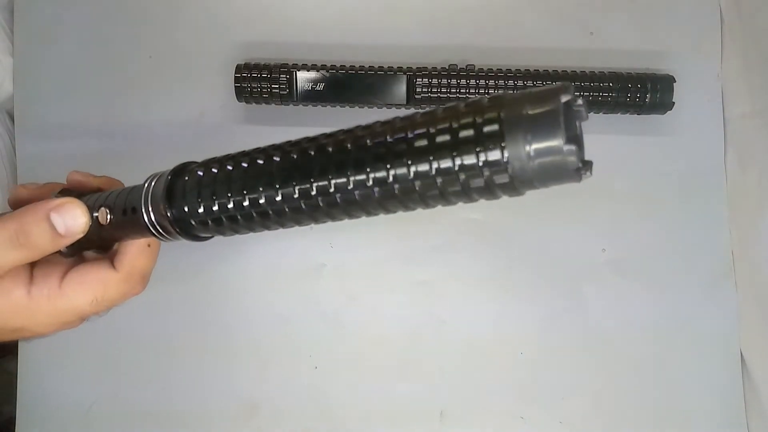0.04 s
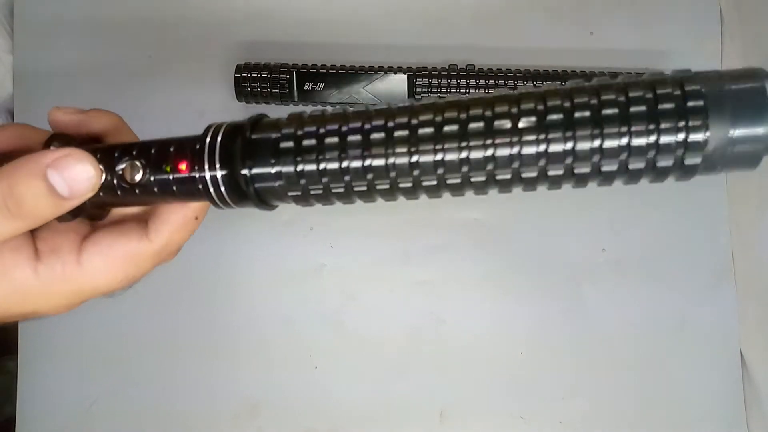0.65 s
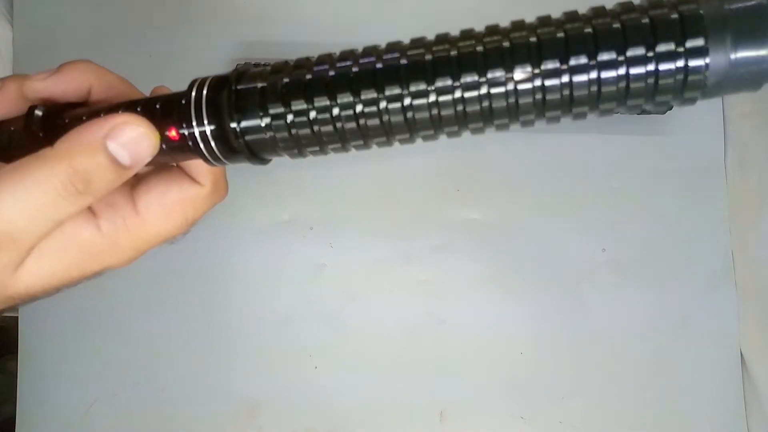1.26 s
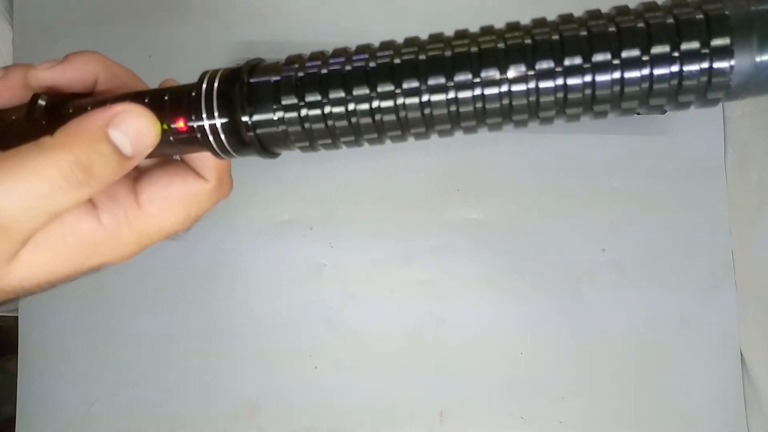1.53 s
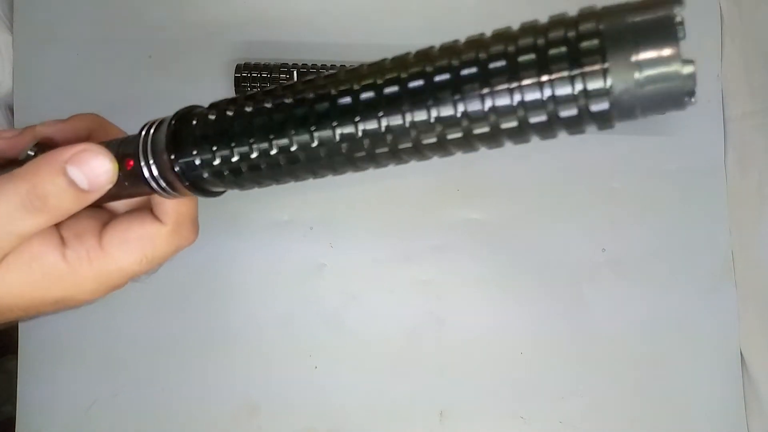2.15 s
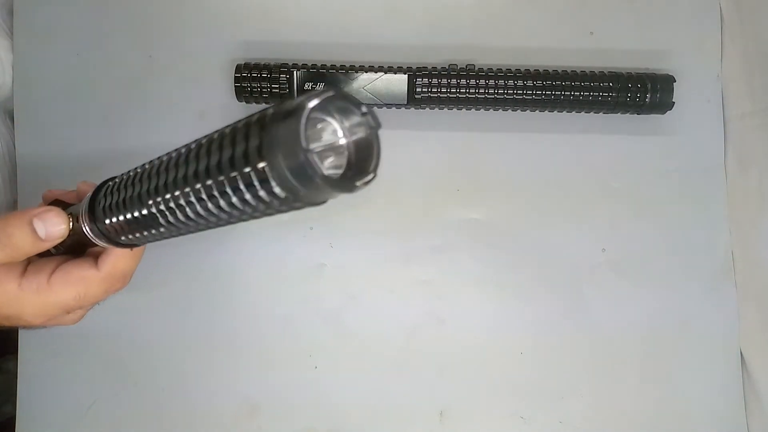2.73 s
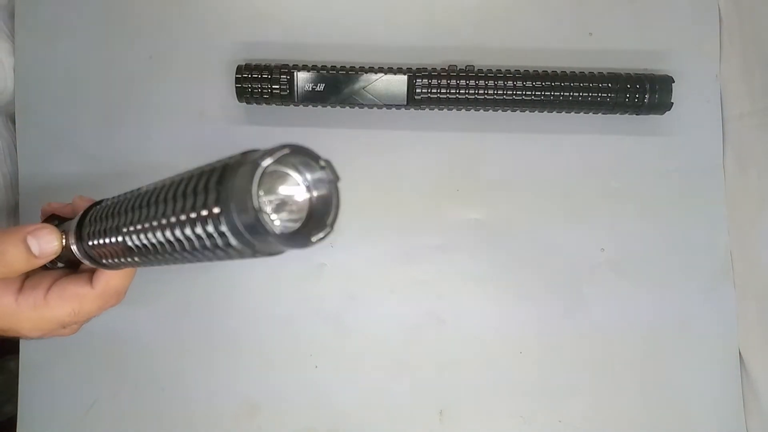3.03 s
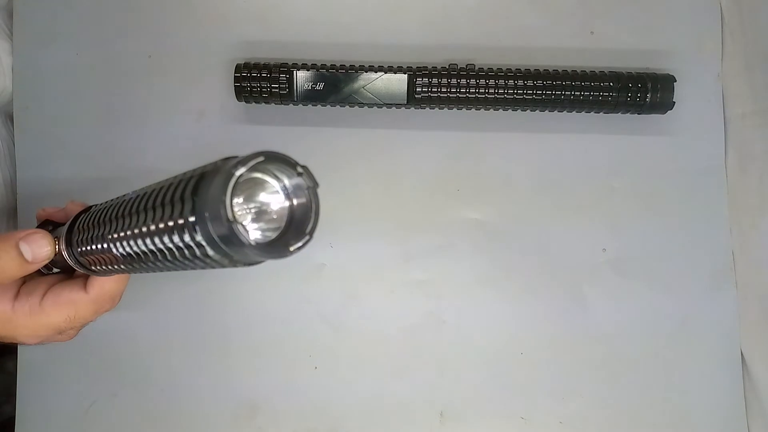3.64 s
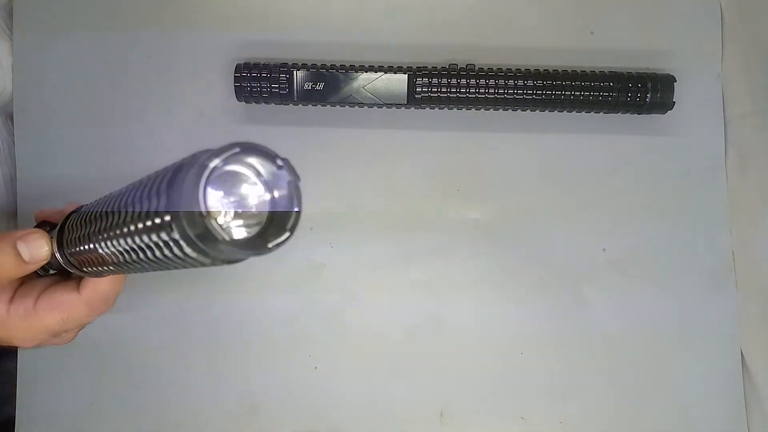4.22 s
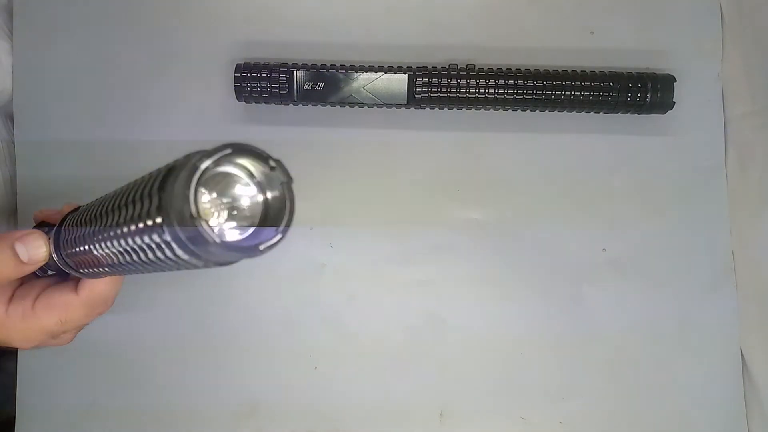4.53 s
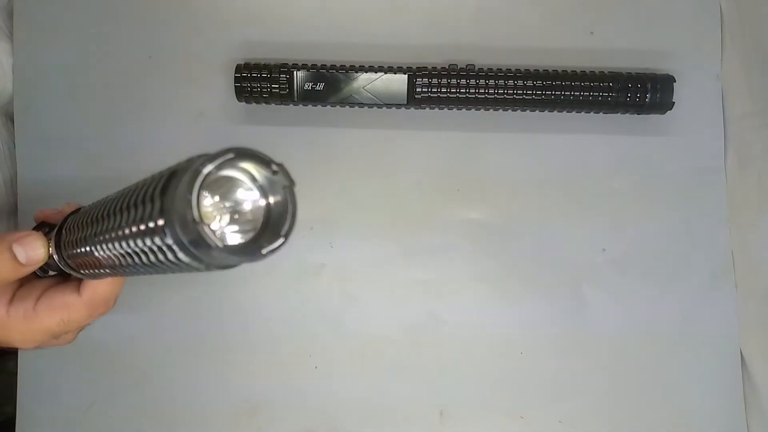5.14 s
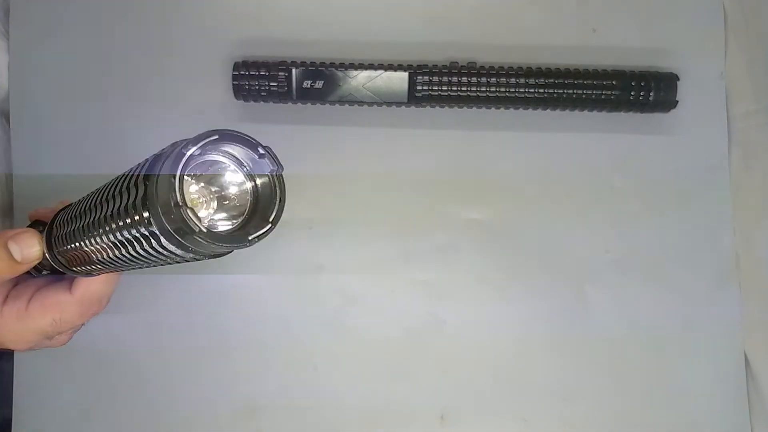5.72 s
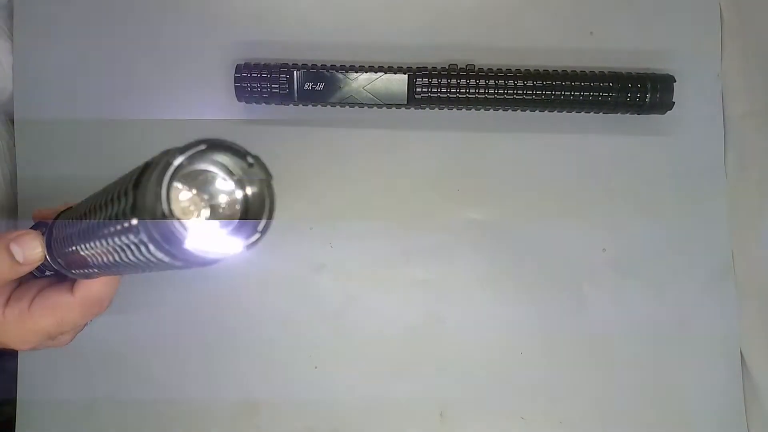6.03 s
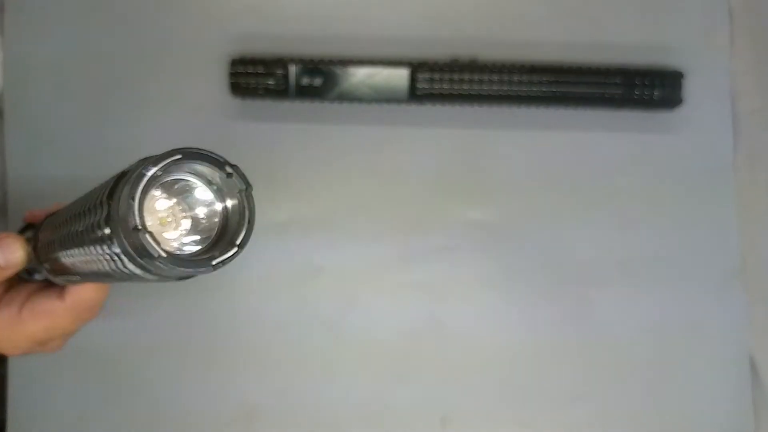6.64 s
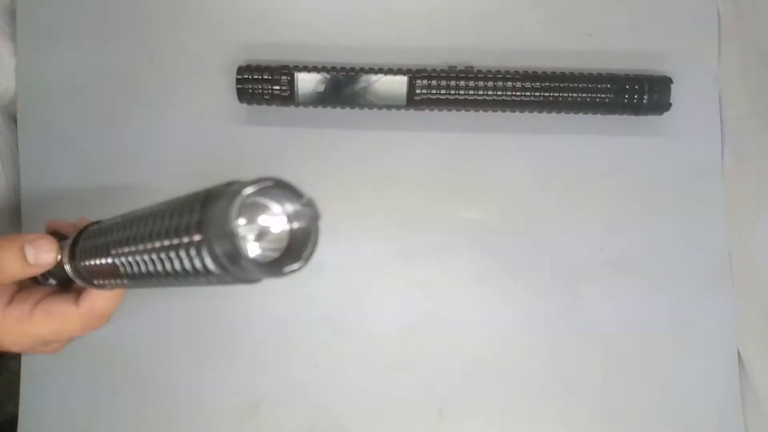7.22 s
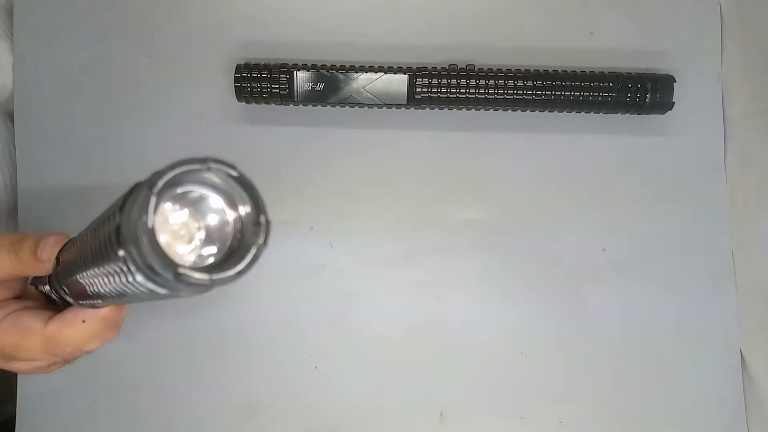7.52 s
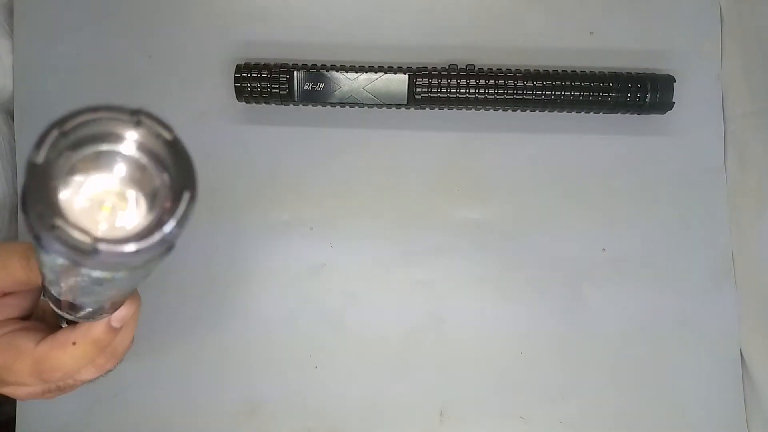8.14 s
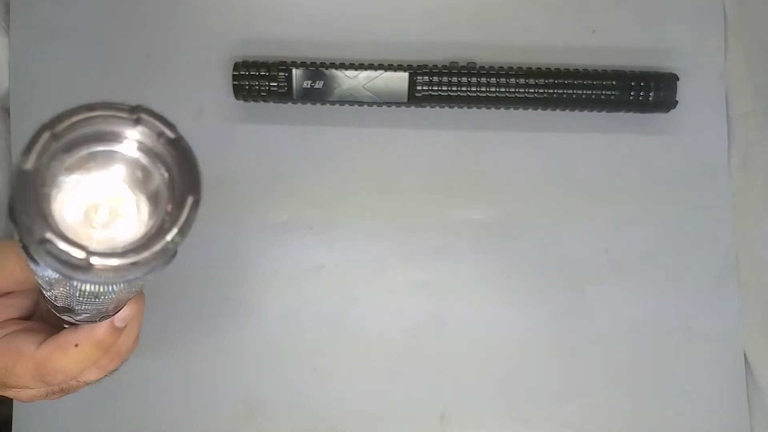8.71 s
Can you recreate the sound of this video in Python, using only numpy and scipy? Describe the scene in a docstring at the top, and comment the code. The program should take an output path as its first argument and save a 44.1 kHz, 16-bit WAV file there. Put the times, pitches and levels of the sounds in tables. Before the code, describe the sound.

A handheld stun baton is switched on with two faint clicks. After about three quiet seconds it gives a short, loud electric zap, then two bursts of harsh, crackling buzz, each about a second long. The arc turns hollow and sputters near the end, and a brief echo follows each burst. Faint finger rubs and clicks remain over soft room hiss. The microphone is close, in a small room.

```python
"""Stun baton in a small room

Close microphone, mono: a baton held over a table is switched on and fires three bursts. About 65 sparks
a second jump its crown; each cracks, thumps, bounces off the table and fills the room. The crown's hollow
colour shifts as the arc hops and travels round it; near the end the arc sputters. The recorder's limiter
pins the buzz, so the echo swells up when a burst stops. Behind it: clicks, fingers and room tone."""
import sys
import numpy as np
from scipy import signal
from scipy.fft import rfft, irfft, next_fast_len
from scipy.io import wavfile
from scipy.ndimage import uniform_filter1d, minimum_filter1d

SR = 44100
rng = np.random.default_rng(int(sys.argv[2]) if len(sys.argv) > 2 else 0)


def wav_record(signal):
    """Record a signal, one row per channel, as 16-bit PCM in the file named by sys.argv[1]."""
    frames = np.transpose(np.atleast_2d(signal))
    bounded = np.clip(frames, -1, 1)
    # unit amplitude maps onto the largest positive 16-bit level
    quanta = np.round(bounded * 32767).astype(np.int16)
    wavfile.write(sys.argv[1], SR, quanta)


N = 395577
TIME = np.arange(N) / SR
SIZE = 4096  # samples in one spark or click
AGE, HZ = np.arange(SIZE) / SR, np.fft.rfftfreq(SIZE, 1 / SR)
TURN_S, TURN_TAKES_S = 4.73, 0.045  # the turn: mid-burst, the buzz goes hollow, softer and duller
LIFT_S, LIFT_TAKES_S = 4.02, 0.64  # the lift: the room tone and the echo's lows come up

# Bursts of sparks: start t/s, length/s, thump/dB, midrange/dB, table bounce/dB, opening snap/dB
BURSTS = [(3.3477, .202, -1.5, -1, -16, -7.5), (4.1134, 1.095, -4.5, 2.5, -24, 6.5),
          (5.6671, .994, -1, 6.5, -18, -10)]
# The capacitor's recharge pace in each burst: t/s, spark rate/Hz
PACE_1 = [(3.348, 61.42), (3.448, 63.92), (3.547, 62.19)]
PACE_2 = [(4.113, 61.88), (4.247, 63.26), (4.382, 65.97), (4.516, 64.21), (4.65, 66.14), (4.784, 63.98),
          (4.918, 66.27), (5.052, 66.62), (5.186, 61.51)]
PACE_3 = [(5.667, 65.24), (5.778, 63.68), (5.888, 65.61), (5.999, 65.84), (6.109, 64.42), (6.219, 62.55),
          (6.33, 62.82), (6.44, 65.89), (6.551, 62.88), (6.661, 60.53)]
def spark_times(jitter_s=0.00036):
    """The capacitor charges and the gap breaks down at an almost steady pace."""
    times = []
    for start, length, *_ in BURSTS:
        t = start + np.arange(0, length, 1 / SR)
        charges = np.cumsum(follow([*PACE_1, *PACE_2, *PACE_3], t)) / SR
        steady = np.interp(np.arange(charges[-1]), charges, t)
        times.extend(steady + jitter_s * rng.standard_normal(len(steady)) * (steady > start))
    return np.array(times)


# The arc's place on the crown: t/s, place (0 = near side, 1 = far side)
PLACE = [(5.67, 0.024), (5.98, 0.039), (6.05, 0.064), (6.09, 0.37), (6.16, 0.4), (6.19, 1), (6.66, 0.83)]
def sparks(times, flutter_db=2, hops_per_s=20, echo_tint=0.19):
    """Crack plus thump, coloured by the crown: the sound at the microphone and that sent into the room."""
    direct, radiated = np.zeros((2, N))
    fade = np.cos(np.pi / 2 * np.arange(SIZE) / SIZE) ** 2
    hand, channel = rng.standard_normal((2, SIZE))
    creep, foot = np.zeros(2 * len(CROWN)), rng.standard_normal(16)
    for s, interval in zip(times, np.diff(times, prepend=0)):
        hand = wander(hand, interval / 0.69)  # echoes change only as the hand moves
        channel = wander(channel, interval / 0.014)  # the hot channel bends
        creep = wander(creep, interval / 0.022)  # the arc's foot creeps, and hops every few sparks
        hops = rng.random() < hops_per_s * interval
        foot = wander(foot, 0.94 * hops)
        place = follow(PLACE, s)
        thump_db, body_db, bounce_db = arc_levels(s)
        spark = crack(s, hand, body_db) * table_bounce(place, bounce_db) + thump(channel, thump_db)
        colour_db = sputter(s, crown(s, place, creep) + passing_peaks(s)) + foot_comb(s, foot) + puffs(s)
        gain = amp(flutter_db * rng.standard_normal())
        add(direct, s, gain * fade * irfft(spark * causal(colour_db)))
        add(radiated, s, fade * irfft(causal(echo_tint * colour_db)))
    return direct, radiated


# The arc swells and shrinks in each burst (the third: near side, then far side): t/s, level/dB
SWELL_1 = [(3.35, -28.5), (3.468, -31.5), (3.55, -34)]
SWELL_2 = [(4.12, -48), (4.35, -41), (4.656, -37), (4.853, -28), (4.93, -23), (5.04, -23), (5.1, -32.5),
           (5.18, -43)]
SWELL_3_NEAR = [(5.67, -55), (5.686, -36), (5.934, -29.5), (5.952, -30), (6.056, -27), (6.096, -45),
                (6.146, -33), (6.18, -42)]
SWELL_3_FAR = [(6.2, -44), (6.26, -30), (6.304, -36), (6.324, -31), (6.432, -34), (6.478, -26),
               (6.538, -46), (6.594, -28), (6.638, -45), (6.66, -41)]
def arc_levels(s, usual_db=-32.5, sag_db_per_s=3):
    """A swollen arc thumps harder and has a fuller midrange, which thins as the burst goes on."""
    nearest_burst = min(BURSTS, key=lambda row: abs(row[0] + row[1] / 2 - s) - row[1] / 2)
    start, _, thump_db, body_db, bounce_db, _ = nearest_burst
    swell_db = follow([*SWELL_1, *SWELL_2, *SWELL_3_NEAR, *SWELL_3_FAR], s) - usual_db
    return thump_db + swell_db, body_db + 0.39 * swell_db - sag_db_per_s * (s - start), bounce_db


# The crack's spectrum, close up: f/Hz, level/dB
CRACK = [(100, -4), (400, -4), (1000, -6), (1900, -7), (3300, -5.5), (4500, -1.5), (6500, -3.5),
         (8200, -5.5), (10000, -10.5), (11300, -19.5), (13700, -21.5), (14800, -4), (15800, -8)]
# Its paths to the microphone by way of things near by: delay/s, level/dB
PATHS = [(0, -4), (.0008, -5), (.0022, -7), (.003, -2), (.0043, -9), (.0052, -16), (.0088, -10)]
def crack(s, hand, body_db, gain_db=47, smear_s=0.00022, scatter_hz=3000, body_hz=1200):
    """The breakdown's spectrum: short waves keep scattering, the midrange is over in milliseconds."""
    nearby = sum(amp(db) ** 2 * (AGE >= d) * np.exp(-2 * abs(AGE - d) / smear_s) for d, db in PATHS)
    pattern = hand + 0.36 * rng.standard_normal(SIZE)
    scatter = amp(turn(s, -11, -19)) * np.exp(-AGE / 0.017)
    lingering = np.sqrt(nearby + scatter ** 2) * pattern
    brief = np.sqrt(nearby + amp(-24) ** 2) * np.exp(-AGE / 0.0075) * pattern
    treble = HZ ** 4 / (HZ ** 4 + scatter_hz ** 4)
    paths = treble * colourless(lingering) + (1 - treble) * colourless(brief)
    midrange = np.exp(-np.log2((HZ + 1) / body_hz) ** 2 / 2)
    bite_db = 1.5 * rng.standard_normal()
    return amp(gain_db) * paths * causal(read(CRACK, HZ) + (body_db + bite_db) * midrange)


def table_bounce(place, db, near_s=0.0013, far_s=0.00195):
    """The table's reflection combs the crack, shifting with the arc's place."""
    delay_s = blend(near_s, far_s, place) * (1 + 0.028 * rng.standard_normal())
    return 1 + amp(db) * delayed(delay_s)


# The thump's spectrum, close up: f/Hz, level/dB
THUMP = [(20, -23.5), (60, 3), (130, -1.5), (270, 4.5), (420, 2), (650, -6.5), (1300, -10.5), (2500, -33),
         (6000, -99.5)]
# The air swings back and forth after each push: delay/s, share
SWINGS = [(.0019, -0.22), (.0042, 0.18), (.0086, .08)]
def thump(channel, db, gain_db=39, flutter_db=2, swing_hz=900, billow_s=0.0046):
    """The spectrum of the heated air's push; the bending channel makes each one a little different."""
    swings = sum(share * delayed(d) for d, share in SWINGS) / (1 + (HZ / swing_hz) ** 2)
    push = causal(read(THUMP, HZ)) * (1 + swings)
    envelope = AGE * np.exp(-2 * AGE / billow_s)
    billow = amp(-0.5) * rfft(envelope * channel) / np.linalg.norm(envelope)
    return amp(gain_db + db + flutter_db * rng.standard_normal()) * push * (1 + billow)


# Hollow resonances of the crown and the gap to the table: near f/Hz, far f/Hz, width/Hz,
# level/dB with the arc open, at its first seat, on the near side, on the far side
CROWN = [(585, 400, 100, 2, 6.5, 8.5, -1), (831, 1100, 130, 3, 8, 0.5, -2), (1365, 1260, 180, 4, 4, 8, 7.5),
         (1954, 1800, 170, 5, -1, 7.5, 1.5), (2203, 2307, 250, 0.5, 0, 10, 9.5),
         (2630, 2620, 140, -0.5, -10, 10, -0.5), (2890, 2800, 210, -1, -2, 8, 18.5),
         (3014, 3239, 200, 1, 6, 5, 8), (3470, 3480, 150, 0.5, -10, -2, 14),
         (3592, 3720, 130, -1, 7.5, 9, 7), (3890, 3980, 220, 1, -2, 10.5, 13.5),
         (4323, 4480, 155, 2, 6.5, 12.5, 8), (5007, 5110, 320, 3, 11.5, 17.5, 17),
         (5380, 6500, 230, 5.5, 0, -2, 2.5), (5520, 5510, 200, 0, 0, 11.5, 15.5),
         (5870, 6100, 250, 2, 12, 10.5, 12.5), (6370, 6350, 250, 4.5, 6.5, 10.5, 12),
         (7070, 6970, 150, 0, 3, 4, 9.5), (7170, 7430, 120, 7, -3, 8, 3),
         (7540, 7830, 220, -5, 3, 9.5, 11.5), (8105, 8150, 330, 4.5, 4.5, 3.5, 4)]
# The floor between the resonances: f/Hz, level/dB
VALLEYS = [(200, -1), (380, -0.5), (500, -9), (900, -8.5), (6300, -7), (6700, -7.5), (7100, -4), (8600, 0),
           (9500, 0.5)]
def crown(s, place, creep, reseat_s=5.5, waver_db=2, waver_hz=27.9):
    """The crown's colour in dB: resonances slide as the arc travels and waver as its foot creeps."""
    depth = turn(s, 0.26, 1)
    db = depth * read(VALLEYS, HZ)
    for resonance, (swell, bend) in zip(CROWN, creep.reshape(-1, 2)):
        near_hz, far_hz, width, open_db, seat_db, near_db, far_db = resonance
        height = turn(s, open_db, seat_db) if s < reseat_s else blend(near_db, far_db, place)
        centre = blend(near_hz, far_hz, place) + waver_hz * bend
        db += (height + depth * waver_db * swell) * bell(centre, width)
    return db


def foot_comb(s, foot, shortest_s=0.000518, longest_s=0.0032, top_hz=3500):
    """Reflections round the arc's foot comb the midrange, in dB; deeper after the turn."""
    delays = np.linspace(shortest_s, longest_s, len(foot))
    ripple = foot @ np.cos(2 * np.pi * np.outer(delays, HZ)) * np.sqrt(2 / len(foot))
    midrange = (1 - bell(0, 380)) / np.hypot(1, HZ / top_hz)
    return turn(s, 2.2, 3.2) * np.minimum(ripple, 1) * midrange


# Passing peaks in the buzz's colour: t/s, half length/s, f/Hz, width/Hz, level/dB
PEAKS = [(3.455, 0.074, 733, 493, 2.5), (4.175, .085, 1450, 450, 6.5), (4.154, 0.072, 2500, 400, 8),
         (4.19, 0.078, 644, 550, 4), (4.4, 0.41, 5130, 350, 0.5), (5.661, 0.018, 1380, 200, 11),
         (5.844, .016, 2210, 300, 10), (6.035, 0.023, 2170, 250, 9), (6.12, 0.065, 2010, 220, 5.5),
         (6.136, 0.032, 680, 220, 15.5), (6.148, 0.034, 1280, 220, 2.5), (6.225, .075, 1560, 170, 10),
         (6.04, .04, 7430, 220, 3)]
def passing_peaks(s):
    """A band of the buzz briefly stands out, as a boost in dB."""
    return sum(db * during(s, at, half) * bell(hz, width) for at, half, hz, width, db in PEAKS)


# Sputters in the last burst: t/s, half length/s, strength (0-1)
SPUTTERS = [(5.859, .01, 0.34), (6.256, .01, 0.16), (6.334, 0.013, 0.5), (6.463, 0.027, 0.68),
            (6.561, 0.011, .8), (6.593, 0.019, 0.67)]
# The pop's spectrum: f/Hz, level/dB
POP = [(150, 9), (400, -4.5), (600, 17), (850, -3), (1230, 11.5), (1650, -21), (2100, 3), (3000, -13),
       (5000, -4), (8000, 5)]
def sputter(s, ringing_db):
    """The arc lifts off the crown and trades its ringing for a pop."""
    lifted_off = sum(strength * during(s, at, half) for at, half, strength in SPUTTERS)
    return blend(ringing_db, read(POP, HZ), min(lifted_off, 1))


# Puffs of the arc: t/s, half length/s, level/dB
PUFFS = [(4.27, 0.021, 7), (4.328, .016, 9), (4.399, 0.01, 7.5), (4.493, 0.0091, 13.5),
         (4.653, 0.0228, 6.5), (4.74, .015, 6), (4.976, 0.12, 6.5), (5.922, 0.064, 9)]
def puffs(s):
    """The arc balloons and pushes out a deeper puff, as a bass boost in dB."""
    return sum(db * during(s, at, half) for at, half, db in PUFFS) * bell(centre_hz=90, width_hz=190)


def arc(echo_db=26.5, low_hz=1697, thin_db=-13.5, full_db=1):
    """The sparks, close by and thrown back by the room; the echo is thin until the lift."""
    direct, radiated = sparks(spark_times())
    echo = amp(echo_db) * room(radiated, build_s=0.0032)
    lows = lowpass(echo, low_hz)
    return direct + echo - lows + amp(blend(thin_db, full_db, lift(TIME))) * lows


# The small room's echo at the microphone: f/Hz, level/dB
ECHO = [(60, -17), (500, -9.5), (1500, -5.5), (2800, -5), (4500, 1), (8200, 8.5), (10000, 0.5),
        (11500, -9.5), (13700, -7.5), (14800, 8.5), (15800, -9)]
# Its time to fall by 60 dB: f/Hz, decay/s
ROOM_T60 = [(100, 0.3), (1000, 0.22), (4000, 0.27), (8000, 0.21), (15000, 0.2)]
def room(x, build_s):
    """A dense echo builds up, each band dying at its own speed."""
    hz, t, bands = signal.stft(rng.standard_normal(SR), SR, nperseg=256)
    tail = signal.istft(bands * amp(-60 * t / read(ROOM_T60, hz)[:, None]), SR, nperseg=256)[1]
    tail *= 1 - np.exp(-(np.arange(len(tail)) / SR / build_s) ** 2)
    tint = irfft(causal(read(ECHO, np.fft.rfftfreq(2048, 1 / SR))))
    return signal.oaconvolve(x, signal.fftconvolve(tail / np.linalg.norm(tail), tint))[:N]


# Snaps of the switch and the casing: t/s, level/dB, decay/s
CLICKS = [(.0035, -38.5, 0.007), (.2564, -34.5, 0.0043), (7.75, -56, 0.0035), (8.49, -54, 0.0049)]
# Their spectrum: f/Hz, level/dB
CLICK_COLOUR = [(200, -19), (3300, -16), (4300, 0), (5500, -3), (7400, 9), (8600, 1), (10000, -12),
                (12500, -16.5), (15000, -10)]
def clicks(echo_db=-20, scatter_db=-13, scatter_s=0.01):
    """Switch and casing snap brightly, scattered briefly by the table and the hand."""
    out, grain = np.zeros(N), noise(CLICK_COLOUR)
    for k, (s, db, decay) in enumerate(CLICKS):
        dying = np.hypot(np.exp(-AGE / decay), amp(scatter_db) * np.exp(-AGE / scatter_s))
        add(out, s, amp(db) * grain[k * SIZE:][:SIZE] * dying)
    return out + amp(echo_db) * room(out, build_s=0.0015)


# Faint ticks ahead of the bursts: t/s, level/dB
TICKS = [(3.3316, -47), (4.0983, -38), (5.651, -44)]
# The tones of one tick: f/Hz, level/dB, decay/s
TICK_TONES = [(6800, 0, .003), (8100, -4, 0.0017), (10750, -17, 0.0024)]
def ticks():
    """A faint high tick sounds one spark interval before each burst."""
    out = np.zeros(N)
    tick = sum(amp(db) * np.exp(-AGE / decay) * np.sin(2 * np.pi * hz * AGE)
               for hz, db, decay in TICK_TONES)
    for s, db in TICKS:
        add(out, s, amp(db) * tick)
    return out


# Fingers shift on the grip: t/s, half length/s, level/dB
RUSTLES = [(.96, .04, -78), (1.68, .015, -73), (1.797, .03, -76), (7.197, .012, -58), (7.42, .025, -62),
           (7.867, .012, -59), (7.98, .02, -69), (8.416, 0.029, -61)]
# The rubbing's spectrum: f/Hz, level/dB
RUSTLE_COLOUR = [(1500, -30), (3300, -2), (4200, -2), (6800, 0), (8000, -10), (11000, -25)]
def rustles(grain_db=3):
    """Skin rubs over the ribbed grip in short grainy strokes."""
    strokes = sum(amp(db) * np.exp(-((TIME - s) / half) ** 2) for s, half, db in RUSTLES)
    return strokes * amp(grain_db * drift(110)) * noise(RUSTLE_COLOUR)


# Tones in the room: f/Hz, level/dB against the rush
HUM = [(108.6, -11), (129, -13), (258, -11), (800, -14.5), (391, -10.5)]
def hum(waver_hz=3, swell_s=7.62, swell_width_s=0.32, swell_db=5):
    """Faint tones waver in pitch and strength; one stands out for a while near the end."""
    tones = []
    for hz, db in HUM:
        phase = 2 * np.pi * np.cumsum(hz + waver_hz * drift(23)) / SR
        tones.append(amp(db) * evened(np.sin(phase) * (1 + 0.5 * drift(7.6))))
    tones[-1] *= amp(swell_db * np.exp(-((TIME - swell_s) / swell_width_s) ** 2))
    return sum(tones)


# Room tone at the microphone, as low rush, hiss and faint top fizz: f/Hz, level/dB
RUSH = [(25, 2), (60, -13), (105, 5), (160, -6), (400, -3), (900, -6), (1600, -9), (2500, -16),
        (5000, -24.5), (12000, -54)]
HISS = [(500, -35), (2500, -1), (4500, -0.5), (7300, 0), (8500, -11), (10000, -22.5), (13500, -30),
        (15000, -20), (15800, -24)]
FIZZ = [(5000, -17.5), (8500, 5), (10500, -4.5), (13000, -11), (14000, -7), (15000, 3), (15800, -5)]
def room_tone():
    """Three bands of noise come up with the lift and hold; rush and hiss later sink."""
    rush_db = -65.5 + 15.5 * lift(TIME) - 5.5 * np.maximum(TIME - 7, 0) - 0.4 * drift(23)
    hiss_db = -77 + 17 * lift(TIME) - 1.5 * np.maximum(TIME - 7.5, 0)
    fizz_db = -97 + 23.5 * lift(TIME)
    rush = patchy(noise(RUSH), depth_db=3.5) + hum()
    hiss = patchy(noise(HISS), depth_db=3)
    return amp(rush_db) * rush + amp(hiss_db) * hiss + amp(fizz_db) * noise(FIZZ)


def patchy(x, depth_db):
    """Narrow bands of a noise come and go by chance, until the lift smooths them out."""
    _, t, bands = signal.stft(x, SR, nperseg=1024, noverlap=768)
    patches = uniform_filter1d(rng.standard_normal(bands.shape), 4, axis=0)
    patches = evened(uniform_filter1d(patches, 11, axis=1))
    bands *= amp(depth_db * patches * (1 - lift(t)))
    return evened(signal.istft(bands, nperseg=1024, noverlap=768)[1][:N])


def amp(db):
    """Decibels to gain."""
    return 10 ** (np.asarray(db) / 20)


def evened(x):
    """Scales to rms 1."""
    return x / np.sqrt(np.mean(x ** 2) + 1e-20)


def read(points, hz):
    """A spectrum's value at hz, on a log axis."""
    f, value = np.transpose(points)
    return np.interp(np.log(hz + 1), np.log(f), value)


def follow(rows, t):
    """A curve's value at times t."""
    return np.interp(t, *np.transpose(rows))


def blend(a, b, share):
    """From a at share 0 to b at share 1."""
    return a + share * (b - a)


def turn(t, before, after):
    """A setting that slides to a new value at the turn."""
    return np.interp(t, [TURN_S, TURN_S + TURN_TAKES_S], [before, after])


def lift(t):
    """Rises from 0 to 1 over the lift."""
    return np.clip((t - LIFT_S) / LIFT_TAKES_S, 0, 1)


def during(s, at, half):
    """1 within an event, falling quickly to 0 outside it."""
    return np.exp(-((s - at) / half) ** 4)


def bell(centre_hz, width_hz):
    """A resonance's shape: 1 at the centre, a half at the edges of its width."""
    return 2 ** -(2 * (HZ - centre_hz) / width_hz) ** 2


def delayed(s):
    """The frequency response of a delay."""
    return np.exp(-2j * np.pi * HZ * s)


def causal(db):
    """The quickest-starting frequency response that has these gains."""
    log_gain = db * np.log(10) / 20
    circle = np.concatenate([log_gain, log_gain[-2:0:-1]])
    return np.exp(np.conj(signal.hilbert(circle)))[:len(db)]


def colourless(echoes):
    """A scatter's spectrum, evened out so that it spreads sound in time without tinting it."""
    spectrum = rfft(echoes)
    return spectrum / np.sqrt(uniform_filter1d(abs(spectrum) ** 2, 41) + 1e-12)


def lowpass(x, hz):
    """The part below hz, with no phase shift."""
    return signal.sosfiltfilt(signal.butter(2, hz, fs=SR, output="sos"), x)


def noise(colour):
    """Steady noise of a given colour, rms 1."""
    size = next_fast_len(N)
    gains = amp(read(colour, np.fft.rfftfreq(size, 1 / SR)))
    return evened(irfft(rfft(rng.standard_normal(size)) * gains, size)[:N])


def drift(rate_hz):
    """A smooth random curve, rms 1."""
    knots = rng.standard_normal(1024)
    return evened(np.interp(TIME * rate_hz, np.arange(len(knots)), knots))


def wander(state, lifetimes):
    """Renews a random pattern: the more lifetimes pass, the less of it is kept."""
    keep = np.exp(-lifetimes)
    return keep * state + np.sqrt(1 - keep ** 2) * rng.standard_normal(len(state))


def add(mix, s, sound):
    """Mixes a sound in at s seconds."""
    part = mix[round(s * SR):][:len(sound)]
    part += sound[:len(part)]


def scene():
    """All that reaches the microphone, the same in both channels."""
    return np.tile(arc() + clicks() + ticks() + rustles() + room_tone(), (2, 1))


def limiter(x, ceiling_db=-13.5, release_s=0.061, hold_samples=1150, ahead_samples=260):
    """Looks ahead, pulls the gain down at once, holds it past the next spark and lets it recover."""
    power_db = 10 * np.log10(abs(uniform_filter1d(x ** 2, 130)) + 1e-12)
    over_db = np.maximum(power_db - ceiling_db, 1e-6)
    held_db = -minimum_filter1d(-over_db, hold_samples, origin=hold_samples // 2 - ahead_samples)
    recovery = TIME / release_s
    cut_db = np.exp(np.maximum.accumulate(np.log(held_db) + recovery) - recovery)
    return x * amp(-uniform_filter1d(cut_db, ahead_samples))


def snap_and_dull(x, split_hz=10000, snap_s=0.0013):
    """Each burst opens with a sharper or softer snap; at the turn the sound sinks and dulls."""
    snap_db = sum(db * (TIME >= s) * np.exp(-abs(TIME - s) / snap_s) for s, *_, db in BURSTS)
    level_db = turn(TIME, -0.05, -2) + snap_db
    top_db = turn(TIME, 3, -4) + 0.89 * snap_db
    low = lowpass(x, split_hz)
    return amp(level_db) * (low + amp(top_db) * (x - low))


def record(dry, overload=0.38, bass_cut_hz=55, edge_hz=15900):
    """The recorder's limiter, soft overload and bass cut; then the snap and dulling, and the band limit."""
    x = overload * np.tanh(limiter(dry[0]) / overload)
    x = signal.sosfilt(signal.butter(2, bass_cut_hz, "highpass", fs=SR, output="sos"), x)
    edge = signal.firwin(511, edge_hz, window=("kaiser", 9), fs=SR)
    return np.tile(signal.oaconvolve(snap_and_dull(x), edge, "same"), (2, 1))


dry = scene()
out = record(dry)
wav_record(out)
```